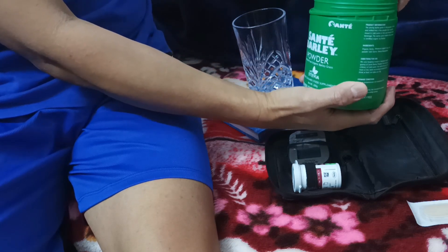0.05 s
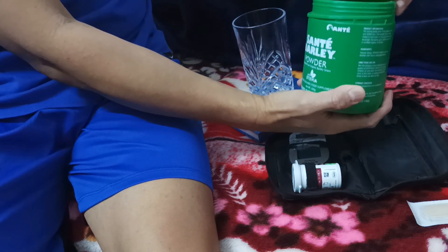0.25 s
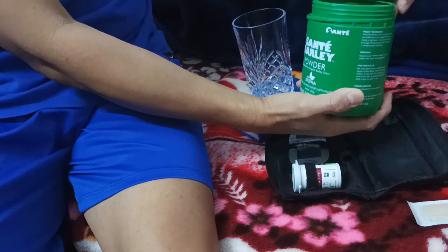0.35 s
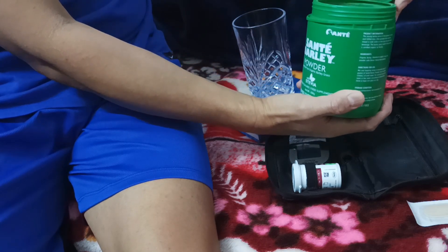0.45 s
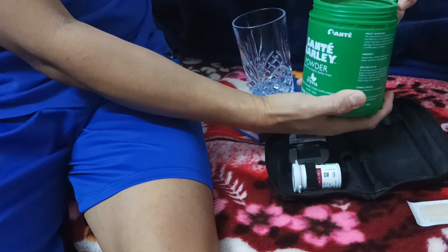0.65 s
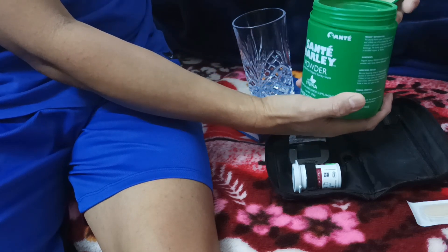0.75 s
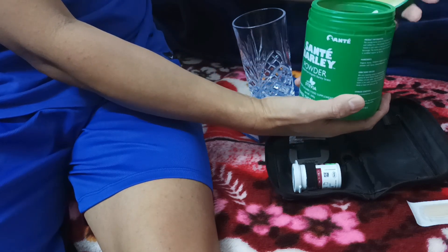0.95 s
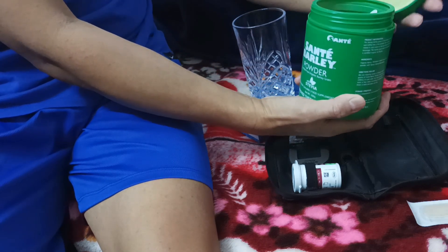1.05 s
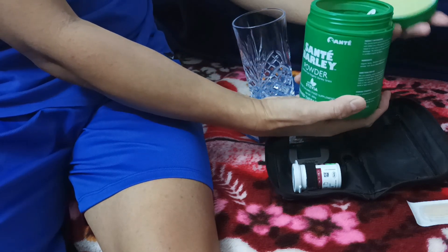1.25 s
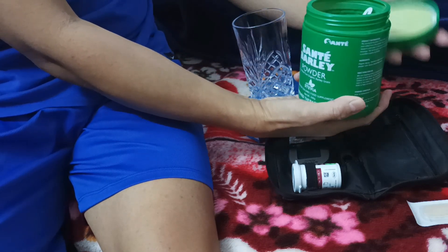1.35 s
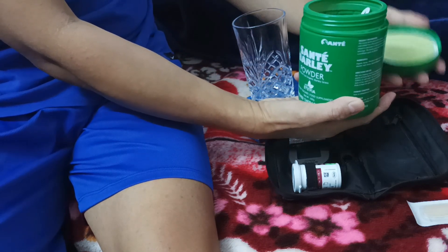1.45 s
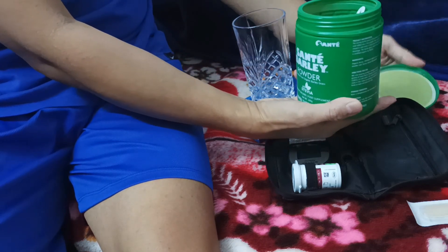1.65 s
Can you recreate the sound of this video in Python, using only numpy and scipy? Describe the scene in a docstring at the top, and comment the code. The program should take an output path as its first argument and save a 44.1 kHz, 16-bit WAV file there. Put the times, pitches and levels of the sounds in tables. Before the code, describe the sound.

Sharp plastic clicks speed into one loud pop as a tub lid comes free indoors

```python
"""In a small soft room the lid of a plastic tub is twisted off. Its rim slips over the thread in a
quick run of snaps, each a burst of slips ringing the lid's modes, with a knock on the hollow tub.
It comes free with a pop and a low thump. Shaped grainy noise makes the scuffs, ticks, rumble and dull
knocks of handling; a gliding sine makes a squeak. Behind them lie patchy room hiss, low hums of
narrow noise and faint steady whines of plain sine."""
import sys
import numpy as np
from scipy import signal
from scipy.fft import rfft, irfft
from scipy.io import wavfile
from scipy.ndimage import uniform_filter1d

SR = 44100
rng = np.random.default_rng(int(sys.argv[2]) if len(sys.argv) > 2 else 0)


def attenuation_scalar(level_db):
    """Turn a level in dB into a linear amplitude multiplier (20 dB per decade)."""
    decades = np.asarray(level_db, float) / 20
    return 10 ** decades


def to_wav(sig):
    """Store sig (one row per channel, or 1-D mono) as 16-bit WAV at the path in sys.argv[1].

    Samples outside -1..1 are clipped; the rate is SR.
    """
    pcm = np.clip(np.atleast_2d(sig), -1, 1) * 32767
    pcm = np.round(pcm).astype(np.int16)
    wavfile.write(sys.argv[1], SR, pcm.T)  # frames by channels


N = 74970  # length in samples

# Snaps and knocks of the lid:
# [t/s, level/dB, brightness/dB per octave about 3 kHz, tub level against the snap/dB, slip length/ms]
LID_SNAPS = [(0.0877, -46, 9.5, -17.5, 2.9), (0.098, -49, 8.5, -28, 5.5), (0.1749, -28, 2.5, -29, 4.2),
             (0.2002, -32.5, 2.5, -31, 2.14), (0.2225, -28.5, 4, -27.5, 2.06),
             (0.2425, -17.5, 1.5, -23.5, 2.13), (0.2626, -11.5, 0.5, -30.5, 2.5),
             (0.2659, -21, 1.5, -15, 0.39), (0.2768, -26, 0, -15, 2.4), (0.2846, -25, -1.5, -11.5, 1.8),
             (0.8201, -39.5, 2.5, -30, 2.83)]
# Lid modes before detuning, tilt and the cap on decay: [f/Hz, level/dB, t60/s]
LID_MODES = [(1242, -10, .012), (1687, -8, 0.011), (2190, -5.5, 0.006), (2922, -4, 0.0059),
             (3700, -9, 0.0089), (4130, -7, 0.0042), (4640, -10.5, 0.0055), (5990, -11.5, 0.0052),
             (6770, -15, 0.0056), (7530, -8, 0.0032), (9770, -19.5, 0.0042), (11130, -22.5, 0.0066),
             (12500, -26, .004), (14900, -32, .003)]
# Tub modes: [f/Hz, level/dB, t60/s]
TUB_MODES = [(333, 1, 0.02), (457.4, -10.5, 0.11), (678, -3.5, 0.07), (850.4, 2, 0.04), (941, -4.5, 0.089),
             (1226, -5.5, 0.078), (1590, -3.5, 0.12), (1667, -0.5, 0.099), (1682, -7, 0.1283),
             (2920, -11, 0.09)]
# Scuffs and ticks of fingers and the loose lid, a low handling rumble at 0.425 s and two dull knocks
# of the tub near 0.86 s; level is before the swell, width is one sigma:
# [t/s, length/s, level/dB, centre f/Hz, width/octaves]
HANDLING_EVENTS = [(0.263, 0.063, -41.5, 2440, 0.91), (0.388, 0.005, -51.5, 3570, 0.66),
                   (0.399, 0.064, -61.5, 3100, 0.7), (.425, 0.087, -60.5, 282, 1.69),
                   (0.484, 0.016, -63.5, 3320, 0.67), (0.543, 0.042, -70, 3430, 0.56),
                   (0.635, .008, -60.5, 3800, 0.55), (.646, 0.0094, -62.5, 3960, .7),
                   (.657, 0.01, -62.5, 3740, 0.52), (0.751, 0.023, -64.5, 2700, 0.78),
                   (0.824, 0.055, -61, 3500, 0.68), (0.854, 0.0061, -55, 750, 1.2),
                   (0.859, 0.013, -59, 760, 0.92), (0.905, 0.042, -66.5, 2100, 0.47)]
# Decay of the room's tail by band: [f/Hz, t60/s]
ROOM_DECAY = [(200, 0.56), (700, 0.61), (2000, 0.24), (5000, 0.31), (12000, 0.2)]
# Low hums; width is that of each of two equal smoothing poles: [f/Hz, width/Hz, rms level/dB]
HUM_BANDS = [(123.7, 6, -67), (727, 22, -75.5), (381, 10, -75), (479, 12, -75.5), (957, 4.5, -81.5)]
# Faint whines, before their stereo lean: [f/Hz, rms level/dB]
WHINE_TONES = [(7445, -91), (7564, -89), (8285, -90), (12129, -91), (12247, -94)]
# Spectral shape of the hiss, relative: [f/Hz, level/dB per Hz]
HISS_SHAPE = [(30, -33), (55, -9), (90, -6.5), (120, -6), (150, -7.5), (350, -10), (750, -15.5),
              (1500, -17.5), (3000, -24.5), (5000, -32), (8000, -34.5), (10000, -41), (13000, -39.5),
              (14200, -44), (16000, -66.5)]
# How alike the hiss is left and right: [f/Hz, correlation 0 to 1]
HISS_LIKENESS = [(60, .4), (200, 0.59), (550, 0.14), (1650, 0.13), (5000, 0.5), (15000, 0.087)]
# Stereo lean of the hiss, left over right; the whines lean twice as far: [f/Hz, level/dB]
STEREO_LEAN = [(60, -4), (240, -1.5), (950, -1), (3770, -2), (15000, 2)]

FREE_S = 0.27  # the lid clears the rim
HELD_DB, HELD_HZ = -7.5, 1300  # until then the seated lid damps the tub's modes above this


def evened(x):
    """Scales to rms 1."""
    return x / np.sqrt(np.mean(x ** 2) + 1e-20)


def read(points, hz):
    """Reads a table on a log-frequency axis."""
    f, value = np.transpose(points)
    return np.interp(np.log(hz + 1), np.log(f + 1), value)


def add(mix, s, sound):
    """Mixes a sound in at time s."""
    part = mix[:, round(s * SR):][:, :sound.shape[-1]]
    part += sound[..., :part.shape[1]]


def late_left(x, lag_s):
    """Delays the left channel, as the spacing of the microphones does."""
    turn = np.exp(-2j * np.pi * np.fft.rfftfreq(N, 1 / SR) * lag_s)
    return np.array([irfft(rfft(x[0]) * turn, N), x[1]])


def ring(modes, tilt_db, scatter, longest_s, detune, held_db=0):
    """Struck plastic: dying sines of alternating sign, scattered left to right, tilted about 3 kHz."""
    low_tilt = 2.2  # brightness acts this much more steeply below 3 kHz
    treble_lean_db = 6.5  # left over right, per octave above 6 kHz
    scatter_db, rise_s = 1.5, 0.00015
    t = np.arange(SR // 4) / SR
    hz, db, t60 = np.transpose(modes)[:, :, None]
    hz = hz * (1 + detune)
    octaves = np.log2(hz / 3000)
    db = db + tilt_db * np.where(octaves < 0, low_tilt, 1) * octaves
    db = db + held_db * (hz > HELD_HZ)
    decay = attenuation_scalar(db - 60 * t / np.minimum(t60, longest_s))
    sines = decay * np.sin(2 * np.pi * hz * t)
    signs = (-1.) ** np.arange(len(modes))
    lean_db = treble_lean_db * np.maximum(octaves.T - 1, 0) * [[0.5], [-0.5]]
    gains = signs * attenuation_scalar(scatter_db * scatter + lean_db)
    rise = 1 - np.exp(-(t / rise_s) ** 2)
    return gains @ sines * rise


def slips(slip_ms):
    """Stick-slip of the rim: one sharp slip, then fading smaller ones that differ left and right."""
    when = rng.random((2, 8))
    sign = rng.choice([-1., 1.], (2, 8))
    strike = np.zeros((2, 400))
    at = np.clip(when * slip_ms * SR / 1000, 0, 399).astype(int)
    np.put_along_axis(strike, at, attenuation_scalar(-10) * sign * (1 - when / 2), 1)
    strike[:, 0] = 1
    return strike


def snaps():
    """Each run of slips strikes the lid's modes; its first slip also knocks the hollow tub."""
    out = np.zeros((2, N))
    lid_count = len(LID_MODES)
    for s, db, tilt_db, tub_db, slip_ms in LID_SNAPS:
        strike = slips(slip_ms)
        scatter = rng.standard_normal((3, lid_count + len(TUB_MODES)))
        detune = 0.015 * scatter[2, :lid_count, None]
        lid = ring(LID_MODES, tilt_db, scatter[:2, :lid_count], 0.01, detune)
        tub = ring(TUB_MODES, 0, scatter[:2, lid_count:], 0.17, 0, HELD_DB * (s < FREE_S))
        add(out, s, attenuation_scalar(db) * signal.fftconvolve(lid, strike, axes=1))
        add(out, s, attenuation_scalar(db + tub_db) * tub)
    return out


def thump():
    """Air leaving the tub at the pop: a low sine that dies fast."""
    start_s, level_db, f_hz, t60_s = 0.263, -33, 250, 0.024
    out, t = np.zeros((2, N)), np.arange(N) / SR
    add(out, start_s, attenuation_scalar(level_db - 60 * t / t60_s) * np.sin(2 * np.pi * f_hz * t))
    return out


def handling():
    """Scuffs, ticks, rumble and dull knocks: uneven noise grains, band-shaped, clumped, peaking early."""
    grain_db, clump_db = 3, 4.5
    size = 4096
    out, hz = np.zeros((2, N)), np.fft.rfftfreq(size, 1 / SR)
    for s, length, db, centre_hz, octaves in HANDLING_EVENTS:
        grit = rng.standard_normal(size)
        grit = grit * attenuation_scalar(grain_db * np.minimum(rng.exponential(1, size), 3))
        distance = np.log2(hz / centre_hz + 1e-9) / max(octaves, 0.1)
        grit = irfft(rfft(grit) * np.exp(-0.5 * distance ** 2))
        clumps = attenuation_scalar(clump_db * evened(uniform_filter1d(rng.standard_normal(size), size=80)))
        progress = np.clip(np.arange(size) / SR / max(length, 0.002), 0, 1)
        swell = np.sin(np.pi * progress ** 0.42)
        add(out, s, attenuation_scalar(db) * evened(grit * clumps) * swell)
    return out


def squeak():
    """Skin on the rim: a short falling sine with a wobbling level."""
    start_s, length_s, level_db, glide_hz = 0.829, 0.012, -53, (4050, 3200)
    out = np.zeros((2, N))
    progress = np.clip(np.arange(N) / SR / length_s, 0, 1)
    hz = np.interp(progress, (0, 1), glide_hz)
    wobble = attenuation_scalar(2 * evened(uniform_filter1d(rng.standard_normal(N), size=60)))
    tone = np.sin(2 * np.pi * np.cumsum(hz) / SR)
    add(out, start_s, attenuation_scalar(level_db) * wobble * np.sin(np.pi * progress) * tone)
    return out


def room(x):
    """Sparse random echoes per channel: a short near cluster, then a tail dying by band."""
    near_db, near_s, tail_db = -5, 0.0028, -7.5  # near_s: time constant of the cluster
    size = SR // 2
    taps = np.zeros((2, size))
    at = np.arange(40, size - 20, 20) + rng.integers(0, 20, (2, (size - 41) // 20))
    np.put_along_axis(taps, at, rng.choice([-1., 1.], at.shape), 1)
    near = taps * np.exp(-np.arange(size) / SR / near_s)
    hz, t, z = signal.stft(taps, SR, nperseg=256)
    decay = attenuation_scalar(-60 * t / read(ROOM_DECAY, hz)[:, None])
    tail = signal.istft(z * decay, SR, nperseg=256)[1][:, :size]
    near = attenuation_scalar(near_db) * near / np.linalg.norm(near[0])
    tail = attenuation_scalar(tail_db) * tail / np.linalg.norm(tail[0])
    return signal.fftconvolve(x.mean(0)[None], near + tail, axes=1)[:, :N]


def hiss():
    """Room and microphone noise: shaped random spectra, slightly patchy, partly shared in stereo."""
    level_db, patch_db = -62, 1.7  # level_db: rms of the left-right mean
    frames, hz = N // 512 + 5, np.fft.rfftfreq(2048, 1 / SR)
    a, b, c, d, patches = rng.standard_normal((frames, 1025, 5)).T
    patches = uniform_filter1d(patches, 20, 0)  # smooth over frequency, then time
    patches = evened(uniform_filter1d(patches, 6, 1))
    same = np.clip(read(HISS_LIKENESS, hz), -1, 1)[:, None]
    left, other = a + 1j * b, c + 1j * d
    z = np.array([left, same * left + np.sqrt(1 - same ** 2) * other])
    lean = read(STEREO_LEAN, hz)[:, None] / 2
    z *= attenuation_scalar(read(HISS_SHAPE, hz)[:, None] + patch_db * patches + np.array([lean, -lean]))
    x = signal.istft(z, nperseg=2048, noverlap=1536)[1][:, :N]
    return attenuation_scalar(level_db) * x / np.sqrt(np.mean(x.mean(0) ** 2))


def hums():
    """Wavering low hums: slow complex noise, partly shared by the channels, shifted up to pitch."""
    t, out = np.arange(N) / SR, np.zeros((2, N))
    for hz, width, db in HUM_BANDS:
        pole = np.exp(-np.pi * width / SR)
        z = rng.standard_normal((3, N)) + 1j * rng.standard_normal((3, N))
        slow = z[:1] + 0.6 * z[1:]
        for _ in range(2):
            slow = signal.lfilter([1], [1, -pole], slow)
        out += attenuation_scalar(db) * evened((slow * np.exp(2j * np.pi * hz * t)).real)
    return out


def whines():
    """Faint whines: steady sines, in phase left and right."""
    t, out = np.arange(N) / SR, np.zeros((2, N))
    for hz, db in WHINE_TONES:
        gains = attenuation_scalar(db + read(STEREO_LEAN, hz) * np.array([[1], [-1]]))
        out += gains * np.sqrt(2) * np.sin(2 * np.pi * (hz * t + rng.random()))
    return out


def scene():
    """Lid, tub and fingers, direct and through the room, over the background."""
    low_cut = signal.butter(2, 100, "high", fs=SR, output="sos")
    near = signal.sosfilt(low_cut, snaps() + handling() + thump() + squeak())
    direct = near * attenuation_scalar(np.array([[-1.6], [1.6]]))  # placed to the right
    mix = late_left(direct, 0.00002) + late_left(hiss(), 0.00007)
    return mix + room(near) + hums() + whines()


def band_limit(x):
    """A steep low-pass at the top of the band."""
    return signal.sosfilt(signal.butter(12, 16460, fs=SR, output="sos"), x)


def record(dry):
    """Rolls off everything above 16.3 kHz and finishes the mix."""
    low_pass = signal.firwin(255, 16300, window=("kaiser", 9), fs=SR)
    mix = signal.oaconvolve(dry, low_pass[None], "same")
    return band_limit(mix)


dry = scene()
out = record(dry)
to_wav(out)
```